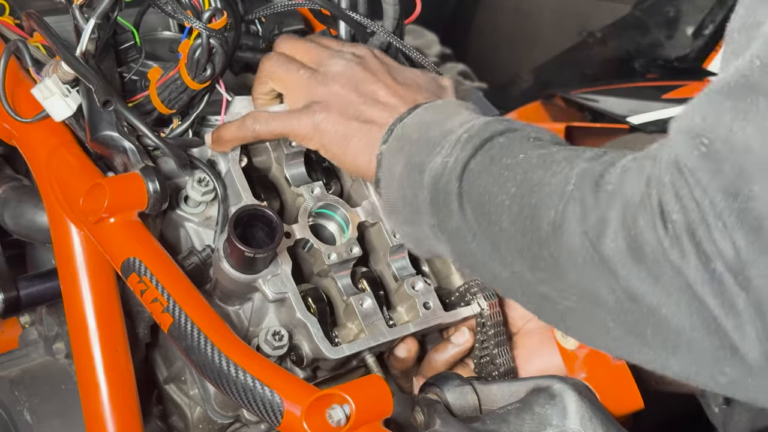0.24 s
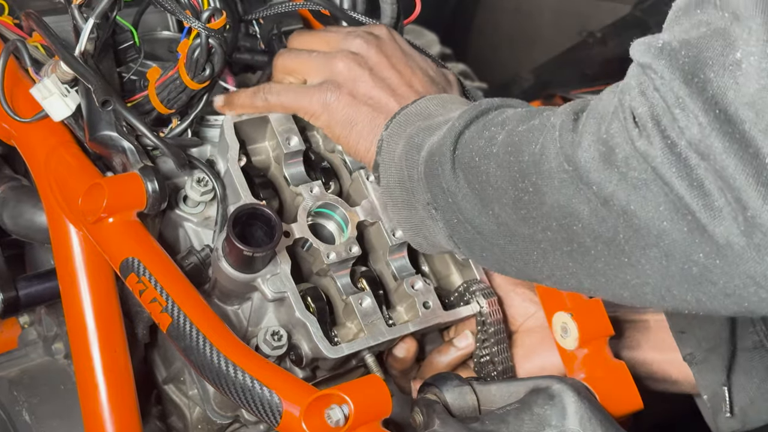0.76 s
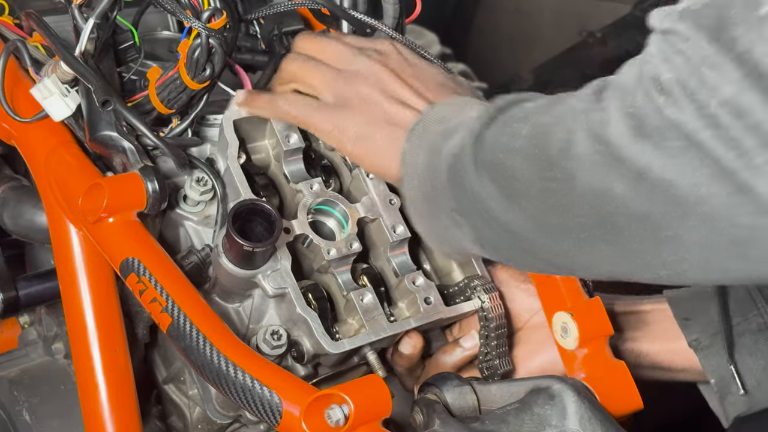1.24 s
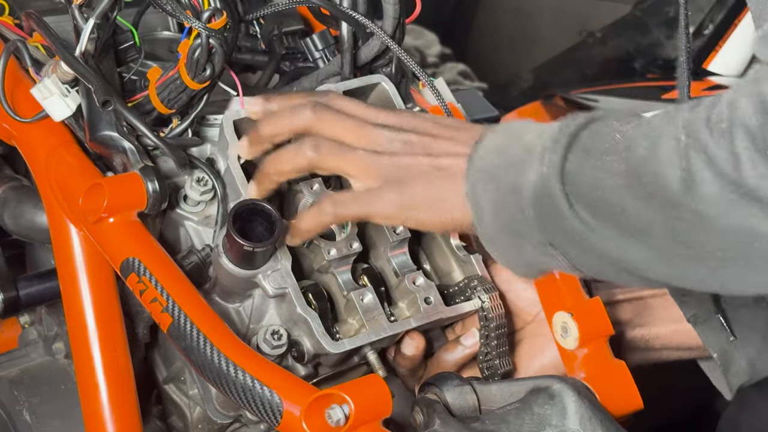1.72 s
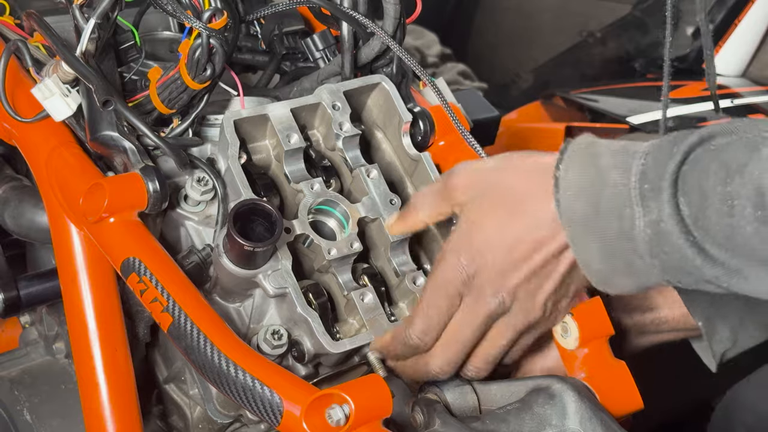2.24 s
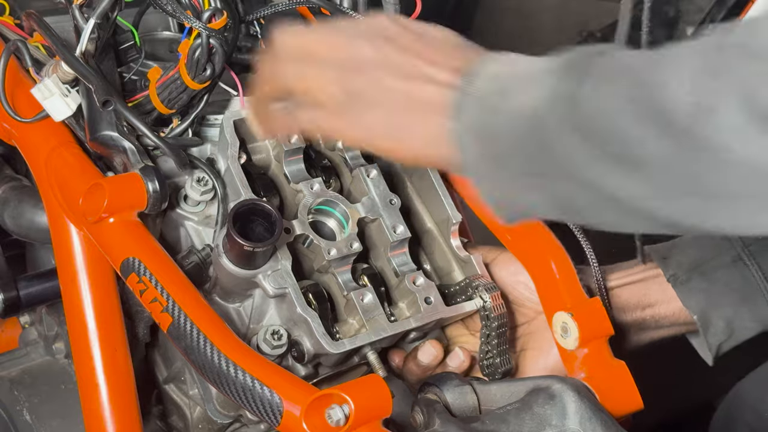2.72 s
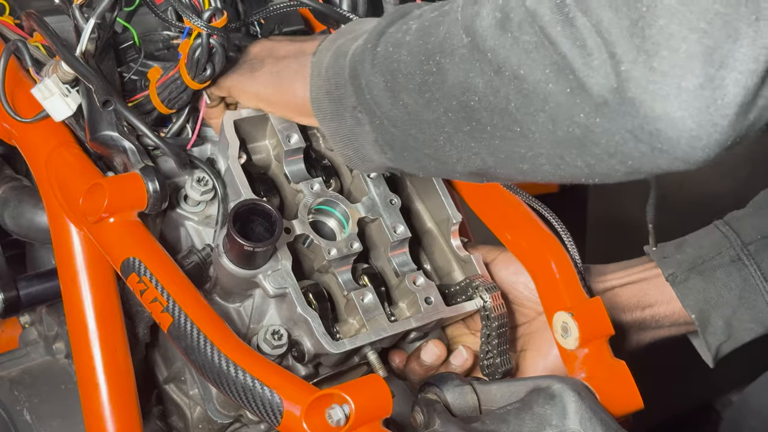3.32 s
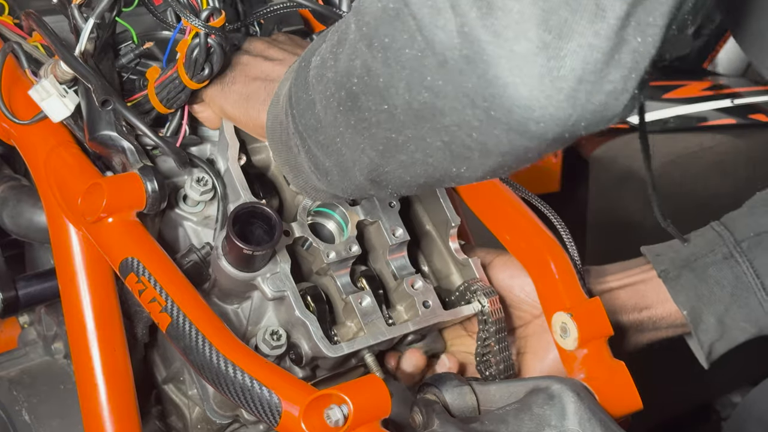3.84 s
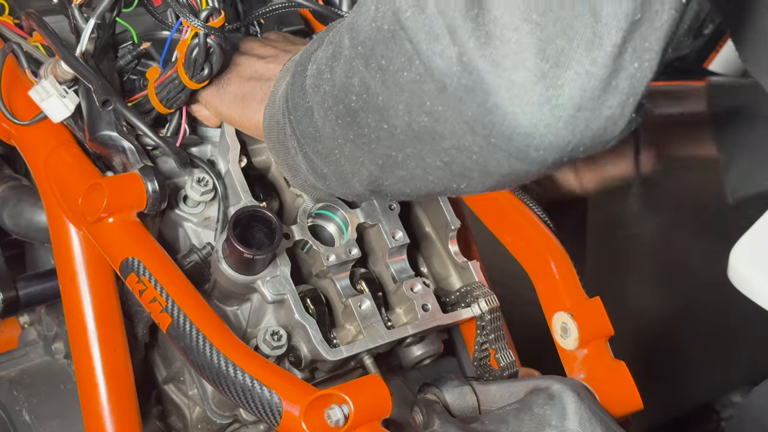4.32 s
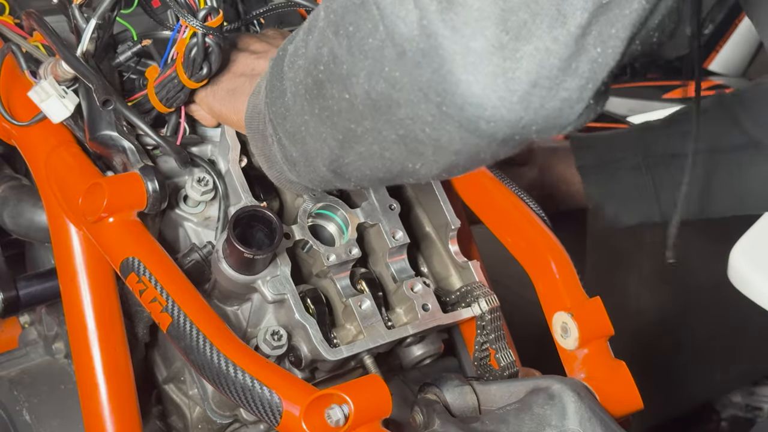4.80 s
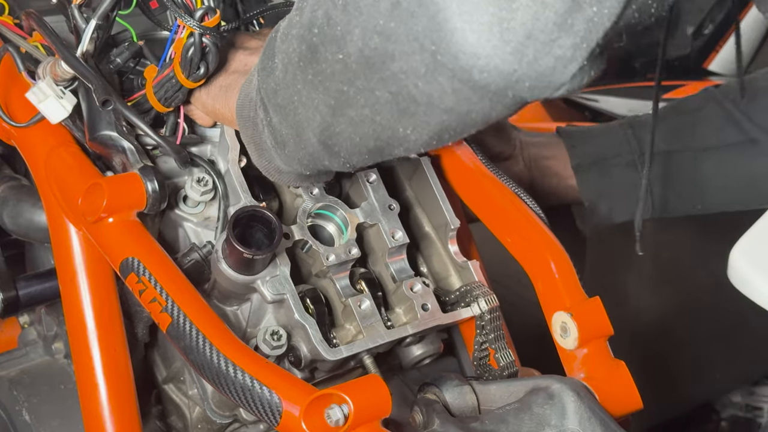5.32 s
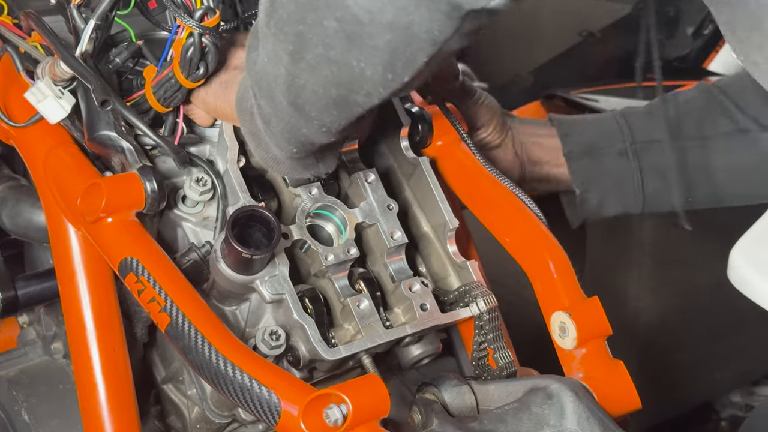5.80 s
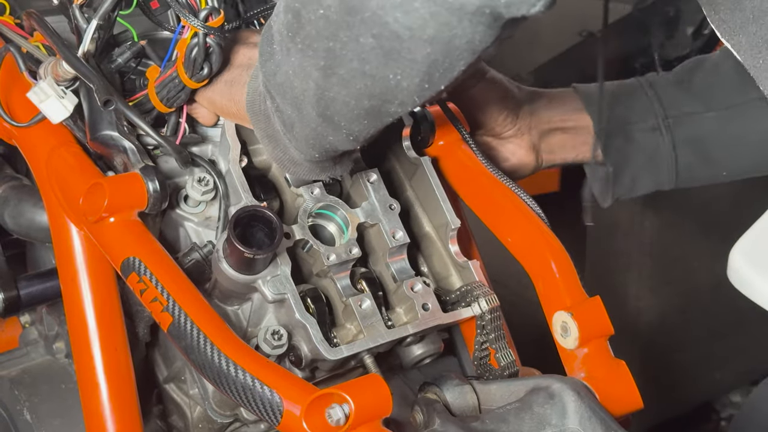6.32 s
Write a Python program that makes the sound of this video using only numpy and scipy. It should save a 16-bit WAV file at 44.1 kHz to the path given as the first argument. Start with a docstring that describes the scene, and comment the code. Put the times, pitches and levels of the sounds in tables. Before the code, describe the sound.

Hands work a tight metal part loose on an engine: sparse sharp clacks, dull frame thumps, small ticks, tiny high squeaks, faint sleeve rustle, close up.

```python
"""Stuck cover in a workshop

A cast-metal cover stuck on an engine is rocked and prised by hand in a small shop, two microphones close.
Bursts of contact noise knock and click through modes of the cover, and the frame thuds below.
A dowel squeaks as a wavering near-sine over a groan of the seat; hands and sleeves rub as flickering hiss.
Faint shaped noise is the air of the shop; above 8 kHz the left channel trails the right."""
import sys
import numpy as np
from scipy import signal
from scipy.fft import rfft, irfft, next_fast_len
from scipy.io import wavfile

SR = 44100
rng = np.random.default_rng(int(sys.argv[2]) if len(sys.argv) > 2 else 0)


def digitize_waveform(pressure):
    """Quantize a signal to 16-bit integers and store it at the path in sys.argv[1].

    Rows of a 2-D input are taken as channels; values are limited to [-1, 1].
    """
    field = np.atleast_2d(pressure).T
    bounded = np.clip(field, -1, 1)
    quanta = np.round(bounded * 32767).astype(np.int16)
    wavfile.write(sys.argv[1], SR, quanta)


N = 288855

# Blows of the cover on its seat; the dB after level_db are relative to it, t60_s is of the contact noise:
# start_s, level_db, thud_db, thud_hz, knock_db, click_db, clack_hz, clack_db, t60_s
KNOCK_EVENTS = [(0.0024, -52.5, 3.5, 61.3, 4, -21, 6030, 13, 0.031),
                (0.127, -56, 6.5, 77, 8, -12, 4760, -15, 0.39),
                (0.164, -40, -2.5, 77, 0, -35, 4500, -23, 0.0053),
                (0.2884, -79.5, 32, 72, -6, -29, 703, -9, 0.012),
                (0.5339, -24, -4, 404, -4, -10, 3740, 1.5, 0.046),
                (0.5566, -27, -1.5, 83, 1, 6, 2980, 15.5, 0.01),
                (0.743, -46.5, 1, 78, 5.5, -44.5, 2900, 3, 0.23),
                (0.7743, -34.5, -4.5, 77, 7.5, -19.5, 4800, 7, 0.016),
                (0.869, -67, 19.5, 66, -7.5, -13, 4480, -24.5, 0.0081),
                (0.959, -51, -7, 360, -32, -6.5, 5000, 0, 0.033),
                (1.0023, -16, -12, 248, -8.5, -10.5, 6450, 5, 0.024),
                (1.0268, -23.5, -3, 152, -5, -8.5, 3080, -3, 0.046),
                (1.3343, -69, -24, 113, 11, -20, 4710, 15, 0.25),
                (1.3686, -65, -8, 108, -24, 15, 950, 13.5, 0.15),
                (1.428, -61.5, -23, 79, -6, 8, 620, 16.5, 0.059),
                (1.498, -45.5, 4, 232, -16, 10, 3170, 8, 0.021),
                (1.5111, -46, -4.5, 230, 5, -16, 2460, -2, 0.12),
                (1.5988, -56, -33, 340, 11, -15, 896, 13, 0.045),
                (2.07, -72, -21, 63, -12.5, -9, 944, 19, 0.036),
                (2.087, -52.5, -24.5, 63, -2.5, 0, 2360, 10.5, 0.023),
                (2.181, -69, -36, 253, -2, 10.5, 591, 17, 0.057),
                (2.394, -54.5, -6.5, 134, -1.5, 25.5, 4100, 12, 0.011),
                (2.4278, -57.5, -24.5, 61.6, 8.5, 4.5, 2290, 14.5, 0.096),
                (2.7888, -62.5, -17, 300, -3, 8, 4920, -7, 0.075),
                (2.8047, -58, -19, 62.2, 2, 19, 5600, 15.5, 0.021),
                (2.82, -53, -27, 260.7, -35, 11.5, 5000, 7, 0.046),
                (2.8428, -60, -37, 61.2, 4, 9, 794, -3, 0.34),
                (2.878, -51, -26, 62.6, -38, -39, 6230, 30, 0.0097),
                (2.8979, -35, -37, 398, 20, -14.5, 3100, 17.5, 0.015),
                (2.942, -42, -12, 295.3, -23, 7, 1148, -3, 0.019),
                (2.97, -38, -12, 159, -32, -1, 1510, 2.5, 0.064),
                (2.9855, -29, -26, 156, -8, -21.5, 1050, 3.5, 0.021),
                (3.189, -63, -18.5, 196, -31, 18.5, 2080, 8, 0.1),
                (3.268, -48, 12.5, 265, 12, -16, 1860, 14.5, 0.067),
                (3.288, -45, -14, 270, 14.5, -11, 2580, 14, 0.044),
                (3.584, -54.5, -1, 63, -4.5, -3.5, 659, -22, 0.064),
                (3.694, -53.5, -14, 80.7, -13, -2, 4370, 4.5, 0.062),
                (3.705, -48.5, 1, 187, 3, -10, 778, -7, 0.056),
                (3.853, -50.5, 4.5, 267, 14.5, -23, 2900, 14.5, 0.018),
                (3.936, -52.5, 3.5, 64.6, -12, -28.5, 790, -16, 0.13),
                (4.1793, -19.5, -56.5, 408, -18.5, -3, 1786, 1.5, 0.047),
                (4.37, -49, -31, 261, 13.5, -10.5, 1050, 13.5, 0.062),
                (4.402, -3, -58.5, 408.3, -12, -23.5, 2940, -5, 0.025),
                (4.4136, -26, -37, 358, 4.5, 3.5, 6830, 17.5, 0.028),
                (4.442, -37.5, -36, 353, 4.5, 4, 2530, 0, 0.047),
                (4.4927, -32, -20, 180, -25, 13.5, 5770, 12, 0.01),
                (4.5764, -33, -55.5, 320, 1, -1, 5170, 3, 0.021),
                (4.6062, -55, -25, 378, -10, -8.5, 893, 19, 0.058),
                (4.699, -34.5, -22.5, 400, -2.5, -27.5, 1560, 1, 0.087),
                (4.7683, -39.5, -7.5, 370, 4, -30, 4560, 11.5, 0.02),
                (4.827, -46, -26.5, 375, 6, -11, 1500, 2, 0.012),
                (4.9161, -49.5, -13, 250, 4, 10.5, 3580, 9, 0.088),
                (4.927, -33, -32, 118.5, -33, -4, 6050, 12.5, 0.014),
                (4.958, -55, -27, 62.7, -32, 10.5, 5510, -17, 0.089),
                (5.012, -37.5, -64, 61, -52, -15, 1905, 6.5, 0.046),
                (5.022, -52, -45, 60.6, -4, -42, 1144, 0, 0.069),
                (5.222, -57.5, -47, 96.3, -3, -11.5, 3490, 10.5, 0.042),
                (5.3003, -45, -33, 109.5, -2, -7, 812, -16, 0.045),
                (5.324, -61.5, -24, 410, -9, 14.5, 2110, 18, 0.041),
                (5.3891, -56.5, -11.5, 101, 6.5, -11.5, 995, -3, 0.059),
                (5.7043, -56.5, 3, 141.4, 16, -15, 2560, 14.5, 0.019),
                (5.713, -61, 6.5, 244.4, -1, -36, 1504, 9, 0.14),
                (5.968, -58, -21.5, 73.9, -3.5, -8.5, 2930, -1, 0.13),
                (5.991, -54, -42.5, 73.7, 5, -16.5, 3200, -12, 0.079),
                (6.016, -42, -45.5, 349, -20, -14, 3930, 0.5, 0.025),
                (6.0581, -59, -23.5, 66.6, 0.5, -16, 2160, 10.5, 0.073),
                (6.208, -52, -33, 249, 4, -0.5, 789, -16, 0.023),
                (6.4575, -64.5, -29, 145, 0, -9.5, 794, 7, 0.071),
                (6.4935, -52.5, -21.5, 112, 13, -24.5, 2100, 11.5, 0.035)]


def from_db(db):
    """Amplitude gain of a level in dB."""
    return 10 ** (np.asarray(db) / 20)


def rms_one(x):
    """Scales a signal to rms 1."""
    return x / np.sqrt(np.mean(x ** 2) + 1e-20)


def at_hz(points, hz):
    """Reads a two-column table on a log-frequency axis."""
    points = np.array(points)
    return np.interp(np.log(hz), np.log(points[:, 0]), points[:, 1])


def band(x, low_hz, high_hz):
    """Band-pass filter."""
    sos = signal.butter(2, [low_hz, high_hz], "band", fs=SR, output="sos")
    return signal.sosfilt(sos, x)


def passes(hz, low_hz, high_hz):
    """Causal response of a band, steeper at its low edge than at its high edge."""
    low, high = 1j * hz / low_hz, 1j * hz / high_hz
    high_pass = (low ** 2 / (low ** 2 + np.sqrt(2) * low + 1)) ** 2
    return high_pass / (high ** 2 + np.sqrt(2) * high + 1)


def resonances(hz, modes):
    """Causal response of each mode: one sample of force sets off a dying sine of the given level."""
    mode_hz, db, t60 = np.transpose(modes)[:, :, None]
    w, s = 2 * np.pi * mode_hz, 2j * np.pi * hz
    return from_db(db) * SR * w / ((s + np.log(1000) / t60) ** 2 + w ** 2)


def drift(rate_hz):
    """Slow random movement of rms 1: noise smoothed by two equal one-pole filters."""
    step = 40  # samples between computed points
    r = np.exp(-2 * np.pi * rate_hz * step / SR)
    noise = rng.standard_normal(N // step + 2002)
    slow = signal.lfilter([1], [1, -2 * r, r * r], noise)[2000:]
    return np.interp(np.arange(N) / step, np.arange(len(slow)), rms_one(slow))


def spread(pair, spectrum=None):
    """Mixes two unrelated signals into left and right by their likeness at each frequency, and colours them."""
    # What the two microphones share: frequency_hz, likeness (0 to 1)
    likeness = [(30, 1), (100, 0.94), (250, 0.88), (700, 0.36), (1500, 0.82), (3000, 0.82), (6000, 1),
                (15000, 0.81)]
    size = next_fast_len(pair.shape[1])
    hz = np.maximum(np.fft.rfftfreq(size, 1 / SR), 1)
    mid, side = rfft(pair, size)
    alike = np.clip(at_hz(likeness, hz), 0, 1)
    gain = 1 if spectrum is None else from_db(at_hz(spectrum, hz))
    both = np.sqrt((1 + alike) / 2) * mid + np.sqrt((1 - alike) / 2) * side * [[1], [-1]]
    return irfft(gain * both, size)[:, :pair.shape[1]]


def air():
    """Air of the shop: steady noise with a fixed colour."""
    # Colour of the air, relative: frequency_hz, density_db (per Hz)
    air_spectrum = [(12, -53), (20, -6.5), (80, -4.5), (278, -2), (341, -2), (388, -13.5), (857, -6),
                    (3500, -47.5), (5540, -21), (9000, 3.5), (11700, -30), (16000, -43)]
    return from_db(-88.5) * rms_one(spread(rng.standard_normal((2, N)), air_spectrum))


def shop(x):
    """Dense echoes of the room that die band by band, a little different on each side."""
    # Reverberation of the shop: frequency_hz, t60_s
    shop_t60 = [(100, 0.48), (500, 0.37), (2000, 0.3), (6000, 0.3), (14000, 0.21)]
    t = np.arange(SR // 2) / SR
    edges = 50 * 2 ** np.arange(0, 8.6, .5)  # half-octave bands, Hz
    white = rng.standard_normal((2, 2, len(t)))
    tail = np.zeros((2, len(t)))
    for k, (low, high) in enumerate(zip(edges, edges[1:])):
        t60 = at_hz(shop_t60, np.sqrt(low * high))
        # neighbouring bands take different noise
        tail += band(white[k % 2], low, high) * from_db(-60 * t / t60)
    tail = spread(tail * (1 - np.exp(-t / 0.0015)))
    tail = tail / np.sqrt(np.sum(tail ** 2) / 2)
    return signal.fftconvolve(x[None], tail, axes=1)[:, :N]


def rub(spectrum, grains_per_s, grain_db, flicker_db):
    """Friction: coloured hiss with uneven catches in it, flickering in level."""
    caught = rng.random((2, N)) < grains_per_s / SR
    catches = caught * from_db(grain_db + np.minimum(rng.exponential(1, (2, N)), 2))
    source = rng.standard_normal((2, N)) * (1 + catches)
    return rms_one(spread(source, spectrum) * from_db(flicker_db * drift(18)))


def hands():
    """Palms and sleeves rub all along; the cover scrapes around each knock and the frame rocks after each thud."""
    # Hands on the cover: start_s, rumble_db (frame), dull_db (rub), bright_db (rub)
    handling = [(0.0, -67, -69, -66.5), (0.25, -66.5, -79.5, -81), (0.51, -72.5, -71, -68),
                (0.69, -69.5, -69.5, -62.5), (1.02, -66.5, -72.5, -95.5), (1.17, -71, -73.5, -67.5),
                (1.5, -61, -65, -69.5), (1.77, -68.5, -73.5, -79), (2.769, -68, -76, -79),
                (3.06, -65.5, -64.5, -68.5), (3.54, -69, -72, -82), (3.62, -56.5, -65.5, -76),
                (3.68, -70, -81, -73), (3.74, -54, -64, -95), (3.8, -64, -62.5, -74),
                (3.93, -56.5, -59, -67.5), (4.0, -53, -61.5, -63.5), (4.05, -65, -89, -64.5),
                (4.21, -68.5, -84.5, -54), (4.38, -64, -59.5, -66.5), (4.54, -76, -78.5, -53.5),
                (5.0, -72.5, -85.5, -77), (5.17, -74.5, -78.5, -82.5), (5.33, -79.5, -96, -67),
                (5.49, -75, -83, -81), (5.9, -84.5, -96, -77.5), (6.55, -73, -71.5, -78)]
    # Colours of frame rumble, dull rub and bright rub, relative: frequency_hz, density_db (per Hz)
    rumble_spectrum = [(15, -38), (30, -16.5), (50, 1.5), (72, 2.5), (95, -8), (170, -7), (250, -9),
                       (400, -41)]
    dull_spectrum = [(150, -27), (300, 3), (900, -8), (2000, -12.5), (3500, -32)]
    bright_spectrum = [(1500, 1), (2500, 2.5), (5000, -3.5), (9000, -3.5), (12000, -8.5), (16000, -31.5)]
    dull_scrape_db, bright_scrape_db = -51, -60  # around a -35 dB knock with a thud of 0 dB
    slide_share, shove_share = 0.98, 0.47  # scrape dB per dB of knock and of thud: heavy knocks scrape more
    slide_in_s, slide_out_s = 0.012, 0.037
    rock_db, rock_share, rock_top_s = -54.5, 1, 0.0073  # rumble after a -28 dB thud; dB per dB; time to its top

    t = np.arange(0, N, 64) / SR
    s, *levels = np.transpose(handling)
    rumble, dull, bright = [from_db(np.interp(t, s, db)) for db in levels]
    at, level_db, thud_db = np.transpose(KNOCK_EVENTS)[:3, :, None]
    before, after = np.maximum(at - t, 0), np.maximum(t - at, 0)

    # at each moment the strongest scrape and the strongest rocking count
    slide_gain = from_db(slide_share * (level_db + 35) + shove_share * thud_db)
    slide = np.max(slide_gain * np.exp(-before / slide_in_s - after / slide_out_s), axis=0)
    rock_gain = from_db(rock_share * (level_db + thud_db + 28))
    rock = np.max(rock_gain * after / rock_top_s * np.exp(1 - after / rock_top_s), axis=0)

    rumble = rumble + from_db(rock_db) * rock
    dull = dull + from_db(dull_scrape_db) * slide
    bright = bright + from_db(bright_scrape_db) * slide
    rumble, dull, bright = [np.interp(np.arange(N) / SR, t, gain) for gain in (rumble, dull, bright)]
    out = rumble * rub(rumble_spectrum, 0, 0, 0.89)
    out += dull * rub(dull_spectrum, 100, 2.8, 7.5)
    return out + bright * rub(bright_spectrum, 300, 5.6, 0.93)


def squeaks():
    """Stick-slip on a dowel locks to one mode, swells, holds and stops short with a faint ring; the seat groans."""
    # Squeaks: top_s, pitch_hz, level_db, groan_db (seat), swell_db_per_s, hold_s, jump_hz (at the stop)
    slips = [(0.148, 4450, -56, -45.5, 430, 0.037, 10), (0.782, 4460, -42, -50, 428, 0.022, 220),
             (1.4002, 4330, -46.5, -79, 3500, 0.0015, 53), (3.861, 4550, -68.5, -60, 425.5, 0.0084, 10)]
    groan_hz, groan_width_hz, groan_s = 382, 49, 0.033
    stop_db_per_s, tail_db, tail_db_per_s = 2203, -12.5, 333
    hook_s, waver_hz = .008, 10  # the pitch jumps up over hook_s as the slip stops

    out, t = np.zeros(N), np.arange(N) / SR
    noise = rng.standard_normal(N)
    groan = rms_one(band(noise, groan_hz - groan_width_hz / 2, groan_hz + groan_width_hz / 2))
    for s, hz, db, groan_db, swell, hold, hook_hz in slips:
        before, after = np.maximum(s - t, 0), np.maximum(t - s - hold, 0)
        fall_db = np.maximum(-stop_db_per_s * after, tail_db - tail_db_per_s * after)
        level_db = db - swell * before + fall_db
        pitch = hz + hook_hz * np.minimum(after / hook_s, 1) + waver_hz * drift(45.1)
        phase = 2 * np.pi * np.cumsum(pitch) / SR
        out += np.sqrt(2) * from_db(level_db + 2.7 * drift(66)) * np.sin(phase)
        groan_shape = np.exp(-((t - s - hold / 2) / groan_s) ** 2)
        out += from_db(groan_db) * groan_shape * groan
    return out


def lingering():
    """Modes the fingers miss ring on; the cover chatters on its seat, so each stutters and wavers, high ones most."""
    # Modes that can ring on: frequency_hz, level_db, t60_s (scaled by each blow's share)
    free_modes = [(168.9, -10.5, 0.21), (272.7, -24, 0.37), (505, -34.5, .8), (645, -19.5, 0.3),
                  (742, -15.5, 0.23), (945, -25, .4), (1153, -18.5, 0.25), (1869, -20.5, 0.14),
                  (2190, -20, 0.33), (2430, -4.5, 0.35), (2860, -5, 0.16), (4340, -18.5, .11),
                  (4788, 11.5, 0.027), (5020, -19, 0.49), (5340, -21, 0.4), (5560, -26, 0.26),
                  (5810, -21, 0.28), (6536, -6, 0.065), (10860, -1.5, 0.12)]
    # Blows that leave modes ringing: start_s, level_db, centre_hz, reach_octaves, share (of the ring time)
    ringing_blows = [(0.534, -34, 4790, 0.011, 0.56), (0.553, -22.5, 171, .05, 1.03),
                     (1.013, -25, 173.4, 0.044, 1.5), (0.562, -24, 1150, .05, 1.7),
                     (1.406, -43, 4380, .02, 1.7), (2.899, -13.5, 1150, .05, 0.37),
                     (2.9, -15.5, 650, .05, 0.23), (2.984, -31, 1150, .05, 1.6),
                     (3.19, -29.5, 490, 0.046, 1.6), (3.271, -17, 278, 0.29, 0.86),
                     (4.178, -16, 5540, 0.12, .75), (4.182, -16, 945, .05, .35), (4.402, -25, 2500, 3, .9),
                     (4.699, -10.5, 507, .05, 0.21), (4.701, -26, 1100, .3, .45),
                     (4.716, -25.5, 272, .05, 0.42), (4.855, -41, 5350, 0.017, 0.75),
                     (4.928, -29, 5535, 0.011, 1), (5.012, -36, 1830, 0.036, 0.81),
                     (6.016, -31.5, 2154, 0.049, 0.85)]
    flutter_db, waver_share = 2.5, .003  # at 1150 Hz
    reach_db = 3  # loss at the edge of the reach

    out, t = np.zeros(2 * N), np.arange(SR // 3) / SR
    envelope = (1 - np.exp(-t / 0.002)) * np.cos(np.pi / 2 * t / t[-1])
    hz, mode_db, t60 = np.transpose(free_modes)[:, :, None]
    rough = np.cbrt(hz / 1150)
    stutter, waver = drift(85), drift(29)
    for s, db, centre_hz, reach, share in ringing_blows:
        dying = envelope * from_db(mode_db - 60 * t / (share * t60))
        at = round(s * SR)
        # each mode reads its own stretch of the drifts
        own = rng.integers(0, N - len(t), len(free_modes))[:, None] + np.arange(len(t))
        pitch = hz * (1 + waver_share * rough ** 2 * waver[own])
        phase = 2 * np.pi * np.cumsum(pitch, axis=1) / SR
        modes = dying * from_db(flutter_db * rough * stutter[own]) * np.sin(phase)
        distance = np.log2(hz[:, 0] / centre_hz) / reach
        out[at:at + len(t)] += from_db(db - reach_db * distance ** 2) @ modes
    return out[:N]


def knocks():
    """Each knock is a dying burst of contact noise, heard as it is and through cover and frame."""
    # Modes of the cover: frequency_hz, level_db, t60_s (ringing free, before the fingers damp it)
    cover_modes = np.array([(481, 2.5, 0.48), (788.7, -0.5, 0.88), (940, -1, 0.13), (1123, -2, 0.41),
                            (1384, -5, 0.5), (1520, -5, 1), (1850, -6, 0.63), (2450, -5, 0.21),
                            (2730, 7.5, 0.14), (2930, -10, 0.85), (2990, -4, 1), (3950, -8.5, 0.12),
                            (5070, -3.5, 0.06), (5200, -6.5, 0.67), (5830, -7, 0.76), (5550, -8, 0.47),
                            (5880, 10.5, 0.2), (5960, -5, 0.64), (6700, 4, 0.47), (6340, -9, 0.083),
                            (7745, -13.5, 0.13), (8890, 9.5, 0.37), (10850, -1, 0.2)])
    # Modes of the frame: frequency_hz, level_db, t60_s
    frame_modes = np.array([(68, 6, 0.07), (110, 0, 0.11), (187.2, -8.5, 0.29), (276.3, -10, 0.33),
                            (377, -6, 0.11), (390, -3, 0.075)])
    held = .11  # share of the free ring time left with fingers on the cover
    grip_share = .012  # each grip detunes the modes
    strike_spread_db = 2.5  # chance in each mode's share of a blow

    size = 2 ** 14
    out, t, hz = np.zeros(N + size), np.arange(size) / SR, np.fft.rfftfreq(size, 1 / SR)
    small = passes(hz, 520, 14000)  # a small part radiates no bass
    frame = resonances(hz, frame_modes) * passes(hz, 44, 2000)
    woody, dull, middle = passes(hz, 150, 680), passes(hz, 420, 1900), passes(hz, 1700, 4500)
    bright = passes(hz, 5700, 8500) * passes(hz, 100, 14000)
    fade = np.cos(np.pi / 2 * t / t[-1])
    for s, level_db, thud_db, thud_hz, knock_db, click_db, clack_hz, clack_db, t60 in KNOCK_EVENTS:
        t60 = max(t60, .004)
        rise = 0.0012 * from_db(-.45 * click_db)  # s; dull contacts are soft and build up slowly
        chatter = from_db(2.8 * np.repeat(rng.standard_normal(size // 64), 64))  # many small touches
        force = from_db(-60 * t / t60) * (1 - np.exp(-t / rise))
        grit = rms_one(rng.standard_normal(size) * chatter * force) * np.sqrt(np.mean(force ** 2))

        # ring of the held cover; harder blows get more of it past the fingers
        colour_points = [(800, knock_db), (2800, 0), (8000, click_db - 6)]
        colour = at_hz(colour_points, cover_modes[:, 0])
        modes = cover_modes * [1, 1, held]
        modes[:, 0] *= 1 + rng.normal(0, grip_share, len(modes))
        chance_db = rng.normal(0, strike_spread_db, len(modes))
        cover = resonances(hz, modes) * small
        ring = from_db(colour - 33 + 0.11 * level_db + chance_db) @ cover

        clack_mode = (clack_hz, clack_db - 18.5, max(14 / clack_hz, .005))
        clack = resonances(hz, [clack_mode])[0] * small
        body = from_db(knock_db + 7.5) * dull + from_db(6) * middle + from_db(click_db) * bright
        body = body + clack + ring + from_db(thud_db + 14.5) * woody

        # the heavy frame feels one slow push and answers with the modes near the pitch of the thud
        push = t * np.exp(-t / 0.00065)
        nearby_db = -17 * np.abs(np.log2(frame_modes[:, 0] / thud_hz))
        signs = rng.choice([-1, 1], len(frame_modes))
        thud = (from_db(thud_db + 4.5 + nearby_db) * signs) @ frame * rfft(push / push.sum())

        at = round(s * SR)
        out[at:at + size] += from_db(level_db) * fade * irfft(rfft(grit) * body + thud, size)
    return out[:N]


def scene():
    """Knocks and squeaks with their echoes, the handling and the air of the shop."""
    blows, rings, squeak = knocks(), lingering(), squeaks()
    metal = blows + rings
    # stereo width of the knocks: a faint copy 40 samples late, of opposite sign left and right
    width = from_db(-15.5) * band(np.roll(metal, 40), 400, 7800)
    close = metal + width * [[-1], [1]] + squeak
    echoes = from_db(-3) * shop(blows + 0.5 * rings + 0.26 * squeak)
    return close + echoes + hands() + air()


def record(dry):
    """Above 8 kHz the left channel trails the right by a third of a millisecond; the top is cut."""
    trail_from_hz, trail_turn_hz = 8000, 3000  # half a turn of phase each way per trail_turn_hz
    size = next_fast_len(N + 512)
    hz = np.fft.rfftfreq(size, 1 / SR)
    phase = np.pi * np.maximum(hz - trail_from_hz, 0) / trail_turn_hz
    turn = np.exp(-1j * phase * np.array([[1], [-1]]))  # left later, right earlier
    wet = irfft(rfft(dry, size) * turn, size)[:, :N]
    # 60 dB down from 16450 Hz up
    return signal.sosfilt(signal.cheby2(20, 60, 16450, fs=SR, output="sos"), wet)


dry = scene()
out = record(dry)
digitize_waveform(out)
```